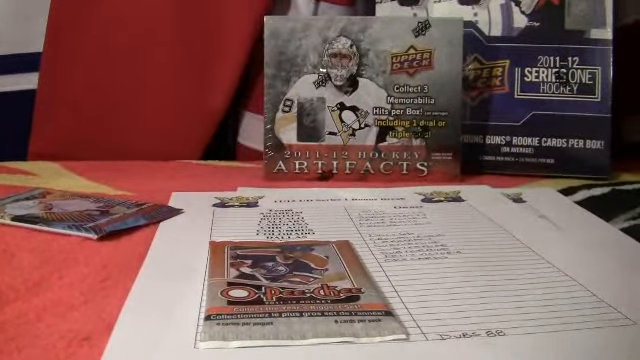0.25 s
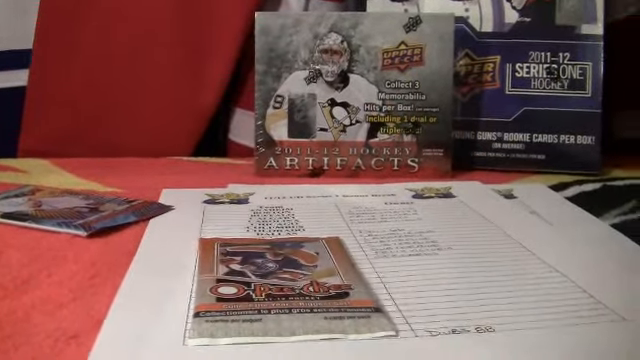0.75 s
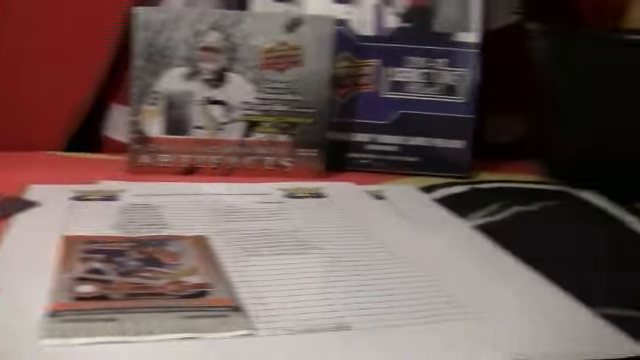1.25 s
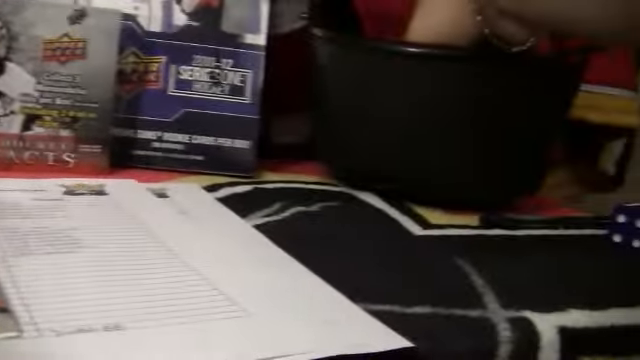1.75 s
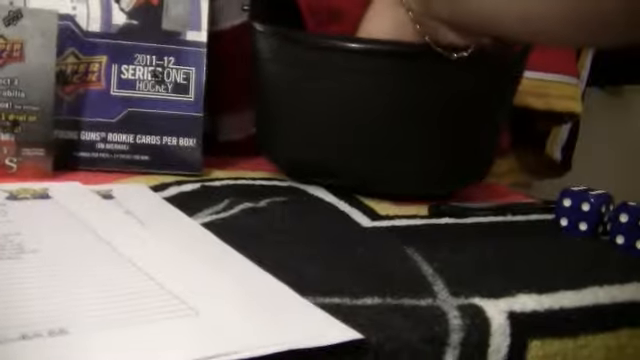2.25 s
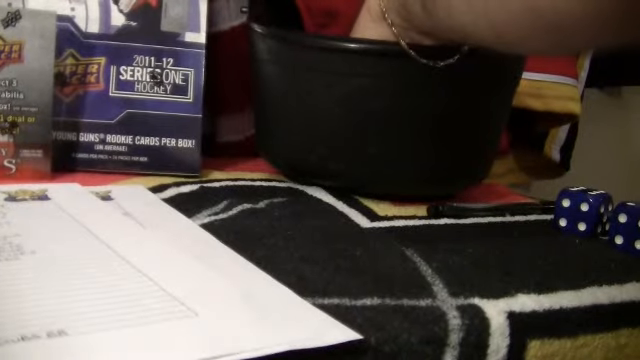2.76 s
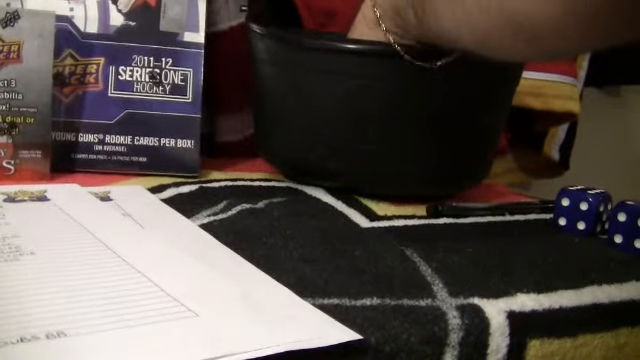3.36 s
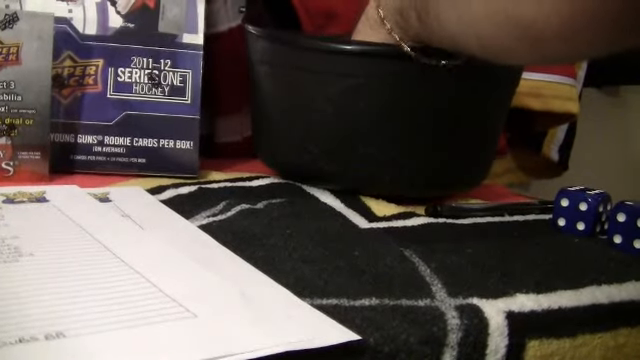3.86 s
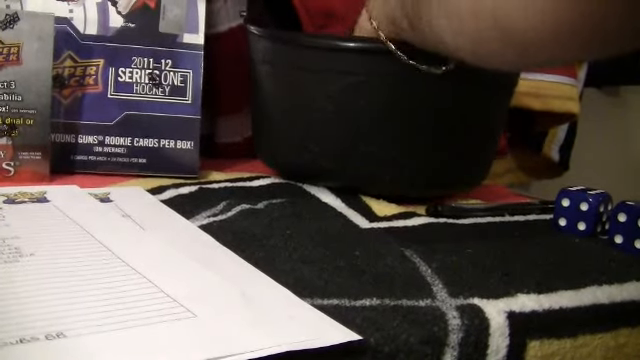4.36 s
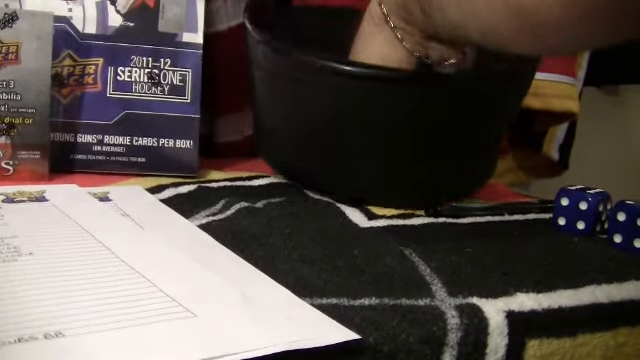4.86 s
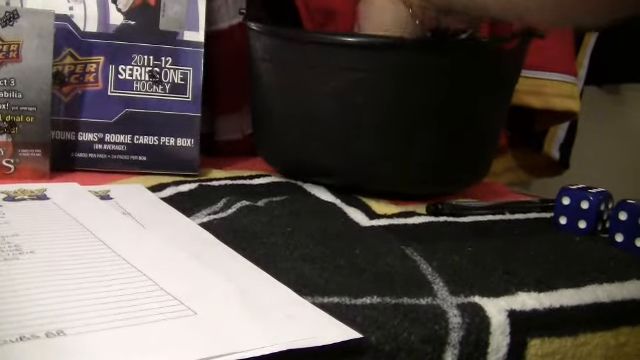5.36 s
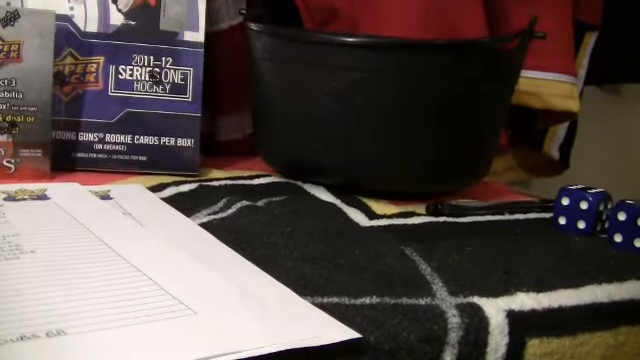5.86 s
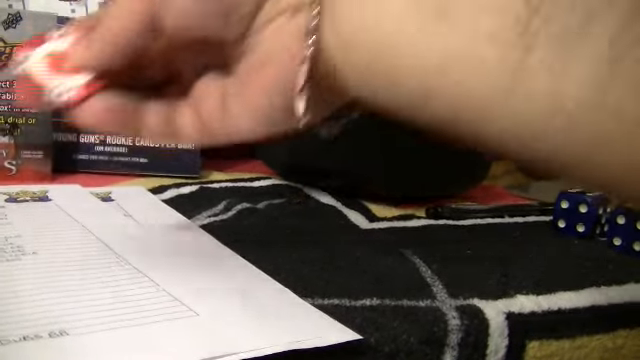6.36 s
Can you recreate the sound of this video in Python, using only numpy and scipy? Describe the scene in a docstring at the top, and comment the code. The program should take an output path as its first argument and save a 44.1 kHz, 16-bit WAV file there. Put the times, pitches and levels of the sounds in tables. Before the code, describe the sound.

Plastic chips clatter and boom in a bowl in a quiet hissy room, stop for small knocks, then rattle again at length and settle.

```python
"""A hand rummages through plastic chips in a plastic bowl, right of a small camera in a quiet, hissing room.
First a burst of collisions: chip modes clack and snap, forced bowl modes boom, flat slaps are short sines.
Then faint ticks inside the camera, dry light touches, knocks and clicks (noise and sine) and drags on
cloth (swelling noise). After a light lone hit and more touches the rummaging returns, longer; small
collisions follow the sweeps. At the end a chip rocks to rest as paired dull taps, with ticks and a touch."""
import sys
import numpy as np
from scipy import signal
from scipy.fft import rfft, irfft, next_fast_len
from scipy.io import wavfile
from scipy.ndimage import uniform_filter1d

SR = 44100
rng = np.random.default_rng(int(sys.argv[2]) if len(sys.argv) > 2 else 0)


def to_wav(s):
    """Save 16-bit WAV."""
    ch = np.atleast_2d(s).T  # columns
    pcm = np.round(np.clip(ch, -1, 1) * 32767)  # PCM
    wavfile.write(sys.argv[1], SR, pcm.astype(np.int16))


N = 290883

PILES = 8  # unlike ways in which the small collisions sound
BOWL_DAMPING_HZ = 13  # typical width that hand and heap add to every bowl mode
LEFT_RIGHT = np.array([[.5], [-.5]])  # splits a left-right difference over both channels


def amp(db):
    """Gain of a level in dB."""
    return 10 ** (np.asarray(db) / 20)


def unit(x):
    """x at rms 1."""
    return x / np.sqrt(np.mean(x ** 2) + 1e-20)


def energy_one(rows):
    """Each row at unit energy."""
    return rows / np.linalg.norm(rows, axis=1, keepdims=True)


def along(points, hz):
    """(Hz, value) points interpolated on a log frequency axis."""
    f, v = np.transpose(points)
    return np.interp(np.log(hz + 1), np.log(f + 1), v)


def filtered(x, response):
    """x times a complex response of frequency."""
    m = next_fast_len(N + SR // 2, True)
    return irfft(rfft(x, m) * response(np.fft.rfftfreq(m, 1 / SR)), m)[..., :N]


def causal(points):
    """Minimum-phase response of (Hz, dB) points, by folding the cepstrum."""
    def response(hz):
        cepstrum = irfft(np.log(amp(along(points, hz))))
        cepstrum[1:len(hz) - 1] *= 2
        cepstrum[len(hz):] = 0
        return np.exp(rfft(cepstrum))
    return response


def rush(spectrum, alike):
    """Stereo noise of rms 1; mid and side shares set the left-right correlation."""
    def mid_side_gain(hz):
        turn = np.arccos(np.clip(along(alike, hz), -1, 1)) / 2
        return amp(along(spectrum, hz)) * np.array([np.cos(turn), np.sin(turn)])
    mid, side = filtered(rng.standard_normal((2, N)), mid_side_gain)
    return unit(np.array([mid + side, mid - side]))


def patchy(x, depth_db):
    """x with slow patches of random gain over time and frequency."""
    z = signal.stft(x, nperseg=512)[2]
    field = uniform_filter1d(rng.standard_normal(z.shape[1:]), size=5, axis=0)
    field = uniform_filter1d(field, size=12, axis=1)
    return signal.istft(z * amp(depth_db * unit(field)), nperseg=512)[1][:, :N]


def hush():
    """The quiet room and the hiss of the microphone: shaped, slightly patchy noise."""
    # room and hiss spectrum: (frequency [Hz], relative level per Hz [dB])
    room_spectrum = [(15, -53), (30, -5.5), (60, -7.5), (177, 0.5), (236, -5.5), (298, -3.5), (604, -11),
                     (941, -12), (1190, -13), (3750, -25), (8210, -31), (11500, -39), (12800, -40),
                     (16600, -74), (22000, -120)]
    # left-right correlation: (frequency [Hz], likeness [-1 to 1])
    room_alike = [(60, .7), (230, 0.3), (860, 0), (3300, 0), (12000, 1)]
    room_db = -56.5
    return amp(room_db) * patchy(rush(room_spectrum, room_alike), depth_db=1.5)


def sweeps(t):
    """Boom, clack and snap levels of the heap at times t: each sweep rises, holds and settles."""
    # sweeps of the hand through the heap: (start [s], length [s], strength [dB], brightness [dB])
    sweep_table = [(-.02, 0.088, -13, 4), (0.129, .11, -18, 1), (0.264, 0.11, -16, -6.5),
                   (0.515, 0.038, -21, -1.5), (2.82, 0.14, -22.5, -3), (3.078, 0.057, -19, -8),
                   (3.158, 0.1, -17.5, -2.5), (3.279, 0.055, -17, -1), (3.414, 0.028, -22, 0),
                   (3.489, 0.075, -15.5, 0.5), (3.596, 0.077, -17.5, -3), (3.705, 0.093, -17.5, -0.5),
                   (3.918, 0.11, -16.5, 0.5), (4.071, 0.042, -14.5, 0), (4.189, 0.071, -12.5, -5),
                   (4.331, 0.19, -22.5, -5.5), (4.489, 0.093, -13, 0.5), (4.632, 0.083, -15.5, 0.5),
                   (4.845, 0.043, -17.5, -2.5), (4.916, 0.15, -23.5, -7.5), (5.211, 0.05, -17.5, -2.5),
                   (5.293, 0.027, -15, -0.5), (5.36, 0.054, -23, -3), (5.45, 0.033, -17, -4.5),
                   (5.638, 0.09, -43.5, 1)]
    # decay after a sweep, a row each for boom, clack, snap: (rate [dB/s])
    settle_db_per_s = [
        [188.5],
        [231],
        [313],
    ]
    # small collisions re the strength, rows as above: (level [dB])
    heap_db = [
        [0],
        [-3],
        [-12],
    ]
    # effect of brightness, rows as above: (slope [dB per dB])
    brightens = [
        [0],
        [0.81],
        [1.4],
    ]
    rise_db_per_s = 695.5
    levels_db = []
    for s, length, db, bright_db in np.array(sweep_table):
        held_db = db + np.array(heap_db) + np.multiply(brightens, bright_db)
        rise_db = rise_db_per_s * np.maximum(s - t, 0)
        settle_db = np.array(settle_db_per_s) * np.maximum(t - s - length, 0)
        levels_db.append(held_db - rise_db - settle_db)
    return np.max(levels_db, axis=0)


def scatter(count, t60, spiky):
    """A blow runs on through the heap as a dying flurry of uneven rebounds."""
    t = np.arange(SR // 7) / SR
    knocks, sizes = rng.standard_normal((2, count, len(t)))
    envelope = amp(-60 * t / t60) * (1 - np.exp(-t / 0.0026))
    return energy_one(knocks * np.exp(spiky * sizes) * envelope)


def pushes(pitch_hz, flurry_t60, flurry_db):
    """Force on the bowl: a soft rebounding contact, then its flurry."""
    t = np.arange(SR // 100) / SR
    pitch = pitch_hz[:, None]
    swing = np.sin(2 * np.pi * pitch * t) * np.exp(-2.2 * pitch * t)
    contact = energy_one(swing * (1 - np.exp(-t / 0.00074)))
    flurry = amp(flurry_db) * scatter(len(pitch_hz), flurry_t60, spiky=0.85)
    flurry[:, 0] = 1  # the blow itself
    return signal.fftconvolve(flurry, contact, axes=1)


def bowl(hz, spread_db=0, damping=0):
    """Wall and air modes of the bowl, all starting in step with the blow, each with a varying share."""
    # bowl modes: (frequency [Hz], width before added damping [Hz], level before damping and spread [dB])
    bowl_modes = [(253.2, 13, 4.5), (435, 63, -2.5), (493, 2.3, 0), (570, 9.7, 13), (657, 73, 3.5),
                  (750, 19, -11), (842, 123, 6), (1100, 150, 1.5), (1363, 190, 3.5), (1780, 82, 7),
                  (145, 22, 0.5)]
    response = 0
    for c, w, db in bowl_modes:
        share = amp(db + spread_db * rng.standard_normal(hz[..., :1].shape))
        width = w + damping
        response = response + share * 1j * hz * np.sqrt(w * width) / (c * c - hz * hz + 1j * hz * width)
    return response


def boomed(force):
    """Each push sounds through the bowl as hand and heap load it at that moment."""
    tuning_spread, damping_spread_db = 0.027, 4
    m = next_fast_len(SR // 2, True)
    hz = np.fft.rfftfreq(m, 1 / SR) * (1 + tuning_spread * rng.standard_normal((len(force), 1)))
    damping = BOWL_DAMPING_HZ * amp(damping_spread_db * rng.standard_normal((len(force), 1)))
    return irfft(rfft(force, m) * bowl(hz, spread_db=3.5, damping=damping), m)


def rings(count, modes, flurry_t60, flurry_db):
    """Chip modes, retuned and reweighted chip by chip; blow and flurry ring several chips at random."""
    rebounders = 4  # unlike chips that take part in a flurry
    t = np.arange(SR // 60) / SR
    ring = 0
    for hz, db, t60 in modes:
        detune, strength = rng.standard_normal((2, rebounders, count, 1))
        envelope = amp(db + 3.5 * strength - 60 * t / t60)
        ring += envelope * np.sin(2 * np.pi * hz * (1 + 0.085 * detune) * t)
    flurry = amp(flurry_db) * scatter(count, flurry_t60, spiky=1.06)
    flurry[:, 0] = 1  # the blow itself
    chip = rng.integers(rebounders, size=flurry.shape)
    return sum(signal.fftconvolve(flurry * (chip == k), energy_one(ring[k]), axes=1)
               for k in range(rebounders))


def laid(shapes, hit_s, hit_db, crowd_s, crowd_db):
    """Distinct hits get a shape each; the crowd shares the last few."""
    blows = np.zeros((PILES, N))
    pile = np.arange(len(crowd_s)) % PILES
    np.add.at(blows, (pile, (crowd_s * SR).astype(int)), amp(crowd_db))
    out = signal.oaconvolve(blows, shapes[-PILES:], axes=1).sum(axis=0)
    for s, db, shape in zip(hit_s, hit_db, shapes):
        out[round(s * SR):][:len(shape)] += amp(db) * shape
    return out[:N]


def collisions():
    """Distinct collisions over a crowd of small ones of uneven strength and colour."""
    # collisions in the bowl: (time [s], relative boom [dB], clack re boom [dB], snap re boom [dB],
    # pitch that the blow favours [Hz])
    hit_table = [(0.005, 3.5, -17, -20.5, 799), (0.013, -11, -19.5, -36.5, 571),
                 (0.031, -4, -16, -39.5, 558), (0.066, -3.5, -20.5, -14, 819), (0.077, -16, -3, -13, 548),
                 (0.109, -8.5, -24, -30.5, 575), (0.143, -6, -11, -19, 831), (0.162, -4, -12, -25, 563),
                 (0.198, -14, -17.5, -34, 690), (0.216, -12, -4.5, -10.5, 760),
                 (0.227, -13, -6, -20.5, 910), (0.25, -17, -13, -39, 667), (0.284, -16.5, -9.5, -17, 880),
                 (0.312, -11, -10.5, -28, 820), (0.321, -11.5, -11, -33, 800),
                 (0.365, -9.5, -16.5, -25, 569), (0.393, -16, -16, -28, 790), (0.447, -23, -20, -30.5, 800),
                 (0.486, -20.5, -18.5, -37, 699), (0.531, -15, -12, -20, 884), (0.54, -12, -15, -23, 810),
                 (0.555, -8, -21.5, -29.5, 657), (2.21, -30.5, -16, -13.5, 685),
                 (2.783, -31.5, -25, -31, 650), (2.798, -29.5, -9, -36, 1100), (2.819, -18, -26, -43, 620),
                 (2.829, -15.5, -17, -46, 576), (2.877, -18, -11.5, -26, 946), (2.9, -4.5, -13.5, -30, 556),
                 (2.92, -14, -14.5, -20.5, 549), (2.944, -17.5, -11, -28, 660),
                 (2.957, -18, -9.5, -25, 700), (3.078, -15, -7, -19, 594), (3.088, -11.5, -18, -24.5, 713),
                 (3.131, -18, -13, -29.5, 588), (3.172, -5, -16.5, -49, 620), (3.199, -9, -8.5, -15, 820),
                 (3.255, -17.5, -21.5, -28, 600), (3.275, -11, -10, -26, 600),
                 (3.292, -7.5, -19, -31.5, 780), (3.303, -4.5, -15, -35, 750),
                 (3.316, -12.5, -10.5, -16.5, 640), (3.424, -8, -19.5, -51, 573),
                 (3.454, -16, -12, -60, 750), (3.506, -7.5, -14, -23, 560), (3.52, -10, -11.5, -28, 788),
                 (3.541, -15, -6.5, -18.5, 635), (3.549, -9.5, -11.5, -21, 790), (3.57, -13, -11, -28, 570),
                 (3.624, -24, -2, -26, 557), (3.643, -15, -5, -15, 685), (3.662, -11, -15.5, -35, 568),
                 (3.708, -35.5, -4, -15, 573), (3.717, -28.5, 4.5, -6, 690), (3.736, -20, -4.5, -5, 704),
                 (3.76, -12, -4, -19, 620), (3.791, -19.5, -5.5, -25, 660), (3.888, -17, -15, -51, 607),
                 (3.914, -8, -17.5, -34.5, 850), (3.924, -8.5, -10.5, -12.5, 595),
                 (3.947, -10.5, -11.5, -15.5, 638), (3.971, -4, -24, -41, 593),
                 (3.991, -13.5, -8, -10.5, 580), (4.009, -11, -5.5, -12.5, 700),
                 (4.027, -18, -5.5, -24.5, 790), (4.044, -13, -22, -17, 600), (4.079, -9, -14, -17, 536),
                 (4.112, -13, -8.5, -30, 780), (4.157, -8.5, -17, -17, 554), (4.185, -6.5, -17.5, -27, 554),
                 (4.2, -9.5, -9.5, -26, 573), (4.239, -7.5, -17, -22.5, 601), (4.256, -4, -14, -13, 583),
                 (4.271, -2.5, -16, -13.5, 815), (4.289, -9, -9, -17, 905), (4.298, -9.5, -18, -18, 825),
                 (4.316, -14.5, -28, -10, 593), (4.336, -10.5, -9, -16, 977), (4.376, -16, -32, -38, 573),
                 (4.401, -8, -19, -47, 542), (4.441, -12.5, -22, -34, 578), (4.482, -13, -26.5, -34, 725),
                 (4.508, -5.5, -12.5, -23, 542), (4.526, -9, -11, -16, 1260),
                 (4.563, -3.5, -25, -37.5, 710), (4.571, -6.5, -15, -49.5, 1044),
                 (4.587, -24, -16, -48.5, 580), (4.652, -16, -2, -29, 570), (4.68, -15, -4.5, -33, 686),
                 (4.704, -9, -12, -30, 570), (4.775, -16.5, -13.5, -34, 862), (4.832, -21, -11, -37, 810),
                 (4.852, -16.5, -4, -11.5, 560), (4.882, -14, -6, -18.5, 696),
                 (4.895, -15.5, -15.5, -39.5, 585), (4.94, -11, -12, -51, 590), (5.07, -29.5, -7, -30, 594),
                 (5.1, -21.5, -9, -13, 563), (5.142, -12.5, -17.5, -52, 607), (5.17, -17, -24, -41, 594),
                 (5.203, -9, -17, -30.5, 590), (5.234, -3, -11.5, -22.5, 635), (5.298, -0.5, -15, -32, 615),
                 (5.311, -4, -25, -18.5, 598), (5.353, 2.5, -17.5, -21, 899), (5.406, -16, -12.5, -33, 567),
                 (5.448, -7.5, -10.5, -8, 852), (5.458, -10.5, -2.5, 1, 1140),
                 (5.474, -8.5, -7.5, -25, 876), (5.503, -11.5, -8, -13, 695), (5.53, -3.5, -13, -20, 600),
                 (5.627, -4.5, -13, -18, 584), (5.663, -14.5, -12, -22.5, 800)]
    # low chip modes, before retuning and reweighting: (frequency [Hz], relative level [dB], t60 [s])
    clack_modes = [(1430, 10, 0.0066), (1880, 3, 0.022), (2170, -5, 0.0083), (2368, 6, 0.0099),
                   (3220, -1, 0.012), (3700, -5, 0.0069), (4170, -8, 0.035), (4400, -21, 0.013)]
    # high chip modes, likewise: (frequency [Hz], relative level [dB], t60 [s])
    snap_modes = [(5280, 0.5, 0.012), (6500, -14, 0.009), (6940, -9.5, 0.0058), (6830, 0, 0.021),
                  (8770, -12, 0.0012), (9620, 3.5, 0.0066), (11260, 5.5, 0.011), (11800, 1.5, 0.0023)]
    # energy of the rebounds re the blow: (boom [dB], clack [dB], snap [dB])
    flurry_db = (-4, 0, -1)
    push_db, clack_drive_db, snap_drive_db = 3.5, 15.5, 17  # how strongly a blow drives bowl and chip modes
    s, boom_db, clack_db, snap_db, pitch_hz = np.transpose(hit_table)
    clack_db = boom_db + clack_db + clack_drive_db
    snap_db = boom_db + snap_db + snap_drive_db

    draw = rng.random((1900, 5))
    crowd_s = draw[:, 0] * (N - 1) / SR
    strength_db = -3.48 * np.log(draw[:, 1] + 0.1)
    colour_db = 7 * (draw[:, 2:].T - .5)
    small_db = sweeps(crowd_s) + strength_db + colour_db

    count = len(s) + PILES
    pitches_hz = np.r_[pitch_hz, np.geomspace(430, 1300, PILES)]
    booms = boomed(pushes(pitches_hz, 0.15, flurry_db[0]))
    boom = laid(booms, s, boom_db + push_db, crowd_s, small_db[0])
    clack = laid(rings(count, clack_modes, 0.089, flurry_db[1]), s, clack_db, crowd_s, small_db[1])
    snap = laid(rings(count, snap_modes, 0.091, flurry_db[2]), s, snap_db, crowd_s, small_db[2])
    return boom + clack + snap


def slaps():
    """A chip slaps flat against the wall, too short to ring it: one short swing of air."""
    # slaps: (time [s], relative level [dB], pitch [Hz])
    slap_table = [(0.0728, -10.5, 910), (0.1651, -12.5, 1480), (0.284, -18.5, 1220), (2.9005, -9.5, 920),
                  (3.197, -6, 1120), (3.295, -14, 850), (4.2024, -6.5, 1510), (4.651, -13, 1250),
                  (4.898, -11.5, 1100), (5.1, -14.5, 3480), (5.313, -11.5, 860), (5.355, -15.5, 1000),
                  (5.627, -12.5, 1830)]
    cycles = 1.3  # until a slap has lost 20 dB
    out, t = np.zeros(N + SR), np.arange(SR // 200) / SR
    for s, level_db, hz in slap_table:
        envelope = amp(level_db + 1.5 - 20 * hz * t / cycles)
        out[round(s * SR):][:len(t)] += envelope * np.sin(2 * np.pi * hz * t)
    return out[:N]


def ticks():
    """Inside the camera: each tick is a falling run of short, rough rings."""
    # runs of ticks: (first tick [s], ticks in the run [count], relative level [dB])
    tick_runs = [(.684, 1, -58), (.7143, 1, -63), (.7956, 1, -59), (.8285, 1, -59), (1.134, 1, -57),
                 (2.0295, 2, -56), (2.6986, 1, -55), (2.7472, 1, -62), (5.8515, 5, -57), (5.901, 1, -62),
                 (5.9344, 1, -61), (6.2028, 1, -66), (6.418, 2, -57.5), (6.5, 1, -57.5), (6.537, 1, -57)]
    # rings of one tick: (frequency [Hz], relative level [dB], t60 [s], delay [s])
    tick_rings = [(2570, 0, 0.015, 0), (2314, 3, 0.022, 0.001), (2060, -1, 0.02, 0.003),
                  (1843, 5, 0.08, 0.0055)]
    tick_every_s = .15
    out, t = np.zeros(N + SR), np.arange(SR // 16) / SR
    for first_s, run, db in tick_runs:
        for k in range(run):
            rough = unit(uniform_filter1d(rng.standard_normal(len(t)), size=30))
            for hz, level_db, t60, delay in tick_rings:
                start = round((first_s + k * tick_every_s + delay) * SR)
                ring = np.sin(2 * np.pi * hz * t) * (1 - np.exp(-t / 0.0011))
                out[start:][:len(t)] += amp(db + level_db - 60 * t / t60) * ring * (.8 + .6 * rough)
    return out[:N]


def touches():
    """Dry light touches, knocks and clicks on camera, table, chips and bowl: a click and a rough pitched knock."""
    # touches: (time [s], relative level [dB], relative knock [dB], relative click [dB], left-right [dB],
    # knock pitch [Hz], knock t60 before the sine's extra decay [s])
    touch_table = [(0.75, -43, -7, -37, -7, 1220, 0.072), (0.855, -32, -11.5, -5, 8, 1230, 0.14),
                   (0.864, -36, -6, -20, -14, 820, 0.13), (0.869, -29, -7, 0.5, -3, 2220, 0.04),
                   (0.856, -40, -8, -30, 3, 334, 0.044), (0.945, -38.5, -3, -3, -5, 327, 0.22),
                   (0.9438, -40, -4.5, -13, -1, 1540, 0.1), (0.962, -37, -6.5, -8, -8, 845, 0.067),
                   (0.978, -44.5, -6.5, -25, 2, 2470, 0.088), (1.193, -17.5, -26, -2.5, -0.5, 3970, 0.018),
                   (1.21, -50, -22, -19, -13, 423, 0.18), (1.233, -46, -5, -19, -8.5, 851, 0.053),
                   (1.262, -30.5, -10, -25, -9, 805, 0.13), (1.345, -39.5, -10.5, -26, -8, 620, 0.49),
                   (2.288, -45, -8, -5, -1, 8100, 0.017), (2.331, -11.5, -15, -27, -6.5, 855, 0.055),
                   (2.418, -53, -23, 9, -1, 5040, 0.023), (2.467, -48, -16, 9, -1.5, 4030, 0.035),
                   (2.493, -42, -7, -16, -5, 1120, 0.13), (2.55, -40, -6.5, -25, -6, 800, 0.047),
                   (2.562, -43, -7, -28, -13, 715, 0.13), (2.583, -30, -6, -14, -5, 1120, 0.13),
                   (2.59, -37.5, -8.5, -20, 1, 2050, 0.092), (2.597, -34, -7, -25, -10, 490, 0.11),
                   (2.655, -40, -7, -25, -6, 940, 0.042), (2.663, -40.5, -6, -25, -8, 816, 0.11),
                   (2.541, -45.5, -29, 7.5, -1, 5060, 0.02), (6.477, -51, -6, -27, -2, 4300, 0.041)]
    out, t = np.zeros((2, N + SR)), np.arange(SR // 8) / SR
    for s, level_db, knock_db, click_db, pan_db, hz, t60 in touch_table:
        band = signal.butter(2, [hz / 3.0, hz * 1.35], "bandpass", fs=SR, output="sos")
        rough = unit(signal.sosfilt(band, rng.standard_normal(len(t))))
        tone = 1.87 * amp(-60 * t / 0.057) * np.sin(2 * np.pi * hz * t)
        knock = amp(knock_db - 2.5 - 60 * t / t60) * (rough + tone)
        click_decay = amp(-60 * t / 0.013) + amp(-21 - 60 * t / 0.08)
        click = amp(click_db - 4.5) * np.diff(rng.standard_normal(len(t) + 1)) * click_decay
        out[:, round(s * SR):][:, :len(t)] += amp(level_db + LEFT_RIGHT * pan_db) * (knock + click)
    return out[:, :N]


def drag():
    """Camera and arm drag on cloth, a little to the right: rumble and rustle noise swells and fades."""
    # drags: (start [s], swell [s], fade [s], rumble top before panning [dB], rustle top before panning [dB])
    drag_table = [(.945, 0.017, 0.05, -59, -46), (1.189, 0.01, 0.068, -38.5, -41),
                  (1.22, 0.044, 0.045, -45.5, -46), (1.25, 0.42, 0.091, -50, -45.5),
                  (1.72, 0.17, 0.098, -58.5, -48), (2.17, 0.043, 0.21, -61, -46.5)]
    # rumble spectrum: (frequency [Hz], relative level per Hz [dB])
    cloth_spectrum = [(120, -2.5), (200, -24), (453, -10.5), (559, -22), (646, -10), (1500, -29.5),
                      (1950, -38), (3300, -120)]
    edge_db = 14.5  # a drag starts and ends this far under its top
    t = np.arange(N) / SR
    levels_db = []
    for s, swell, fade, low_db, high_db in drag_table:
        off_top = np.maximum((s + swell - t) / swell, (t - s - swell) / fade)
        levels_db.append(np.array([[low_db], [high_db]]) - edge_db * off_top ** 2)
    rumble_db, rustle_db = np.max(levels_db, axis=0)
    rustle = rush([(800, -5.0), (1500, 1.5), (4000, -9.0), (6500, -15.0), (12000, 6.5)], [(3000, 0.64)])
    rumble = rush(cloth_spectrum, [(500, 0.35)])
    return (amp(rumble_db) * rumble + amp(rustle_db) * rustle) * amp([[-2.5], [2.5]])


def rocking():
    """Near, then far edge of a rocking chip tap the bowl's floor, dull and weakening to a steady level."""
    # a chip rocks to rest: (start of each swing [s])
    rock_s = np.array([5.714, 5.79, 5.854, 5.927, 5.972, 6.024, 6.07, 6.117, 6.158, 6.203])
    first_db, loss_db, loss_s = -30, 23.5, 0.23  # first swing, loss until steady, its time constant
    far_lag_s, far_extra_s, far_fade_s, far_db = .013, .018, .14, -1  # far edge: extra lag fades
    tap_db = 14  # how strongly a tap drives the bowl
    far_s = rock_s + far_lag_s + far_extra_s * np.exp(-(rock_s - rock_s[0]) / far_fade_s)
    when = np.r_[rock_s, far_s]
    db = first_db - loss_db * (1 - np.exp(-(when - rock_s[0]) / loss_s))
    db = db + np.repeat([0, far_db], len(rock_s)) + tap_db
    shapes = pushes(np.full(len(when) + PILES, 630), 0.043, -0.94)
    taps = laid(shapes, when, db, when[:0], when[:0])  # no crowd
    dull = filtered(taps, lambda hz: 1 / (1 + 1j * hz / 800) ** 2)
    return filtered(dull, lambda hz: bowl(hz, damping=BOWL_DAMPING_HZ))


def chips():
    """Collisions, slaps and the rocking chip in the bowl."""
    return collisions() + slaps() + rocking()


def at_ports(x):
    """Two microphone ports hear the bowl at unlike level and phase; the room adds unrelated weak tails."""
    # what the room returns: (frequency [Hz], level re direct [dB])
    wall_return = [(100, -28), (500, -16), (2000, -10), (6000, -11), (12000, -6.5)]
    # the bowl lies to the right: (frequency [Hz], left-right [dB])
    lean = [(60, 5), (140, 1.5), (250, -3.5), (500, -9.5), (1000, -7), (2000, -4.5), (5000, -2.5),
            (9000, -0.5), (12500, -3)]
    # phase by which the left port leads: (frequency [Hz], lead [rad])
    lead = [(120, -1), (260, -.9), (600, -.1), (1000, .1), (3000, 0)]
    room_t60_s = .18
    t = np.arange(SR // 4) / SR
    tails = rng.standard_normal((2, len(t))) * amp(-60 * t / room_t60_s) * np.exp(-.002 / (t + .0001))
    wet = signal.oaconvolve(x[None], tails / np.linalg.norm(tails[0]), axes=1)[:, :N]
    heard = x + filtered(wet, lambda hz: amp(along(wall_return, hz)))
    return filtered(heard, lambda hz: amp(LEFT_RIGHT * along(lean, hz))
                    * np.exp(1j * LEFT_RIGHT * along(lead, hz)))


def close_sounds():
    """Ticks, touches and drags, all without room tails."""
    return ticks() + touches() + drag()


def scene():
    """Bowl in the room and the dry close sounds."""
    return at_ports(chips()) + close_sounds()


def record(dry):
    """The ports colour the sound, hush is added, the loudest peaks saturate softly, the top is cut."""
    # bass cut and port resonances: (frequency [Hz], gain [dB])
    port_response = [(40, -30), (110, -17.5), (200, 3.5), (6000, 4), (7100, 3.5), (7700, -5.5), (8400, -5),
                     (9000, -7), (9900, -5.5), (11000, -18), (12200, -18), (12700, -88)]
    top_hz = 12950
    x = filtered(dry, causal(port_response)) + hush()
    x = x / (1 + np.abs(x / .97) ** 6) ** (1 / 6)
    return filtered(x, lambda hz: 1 / (1 + (hz / top_hz) ** 60))


dry = scene()
out = record(dry)
to_wav(out)
```